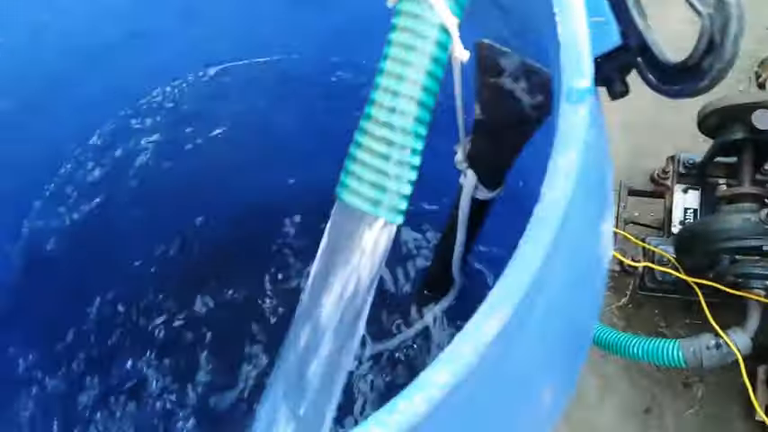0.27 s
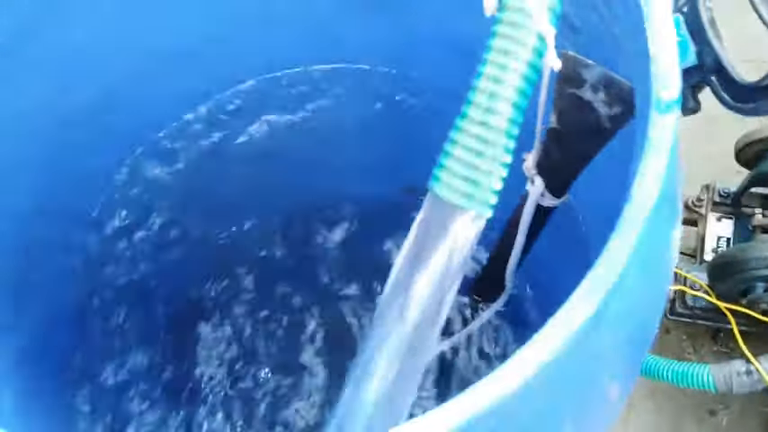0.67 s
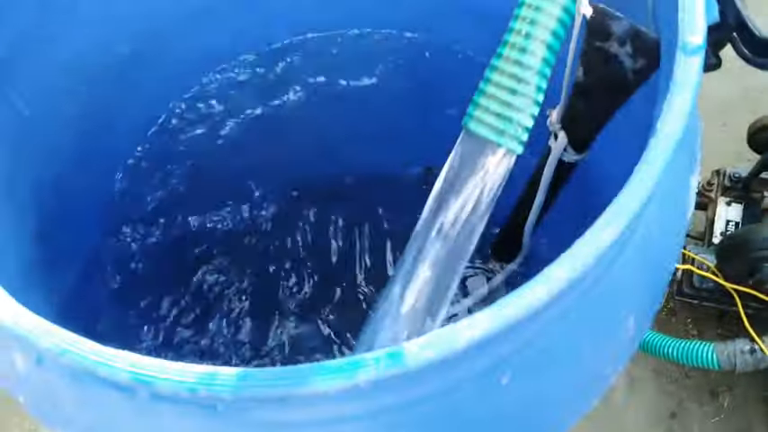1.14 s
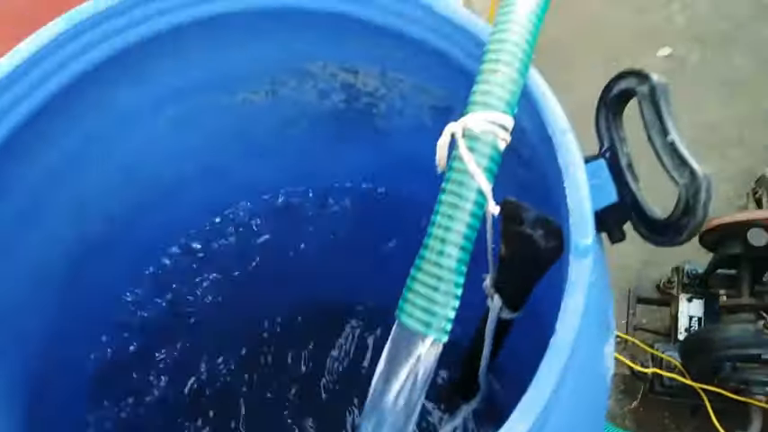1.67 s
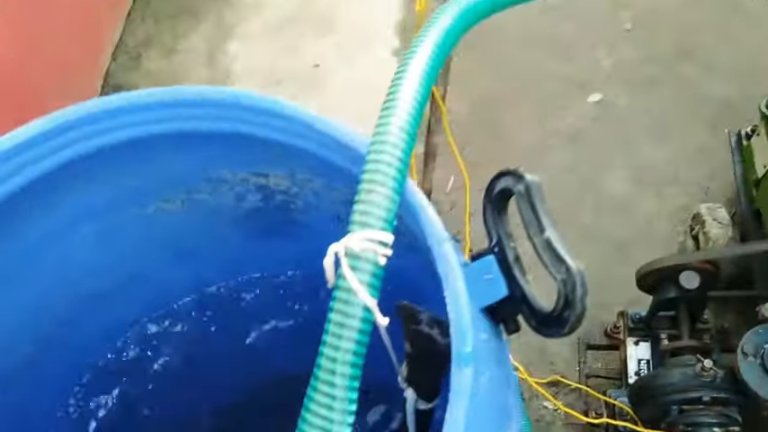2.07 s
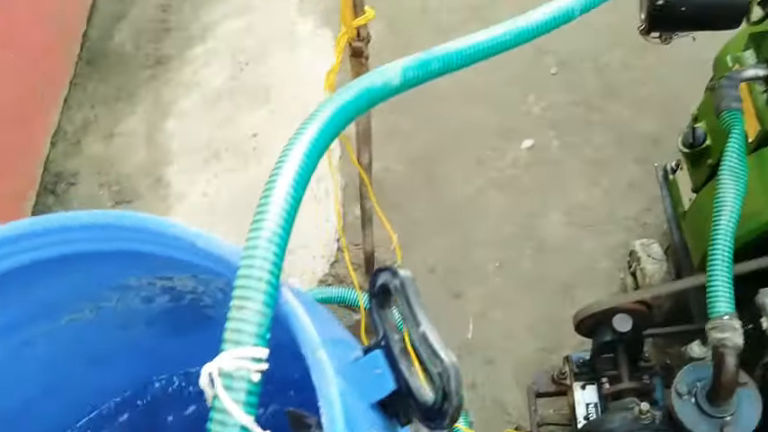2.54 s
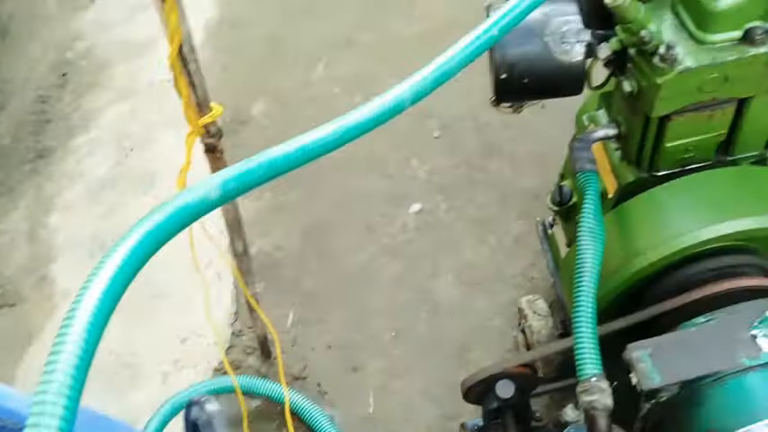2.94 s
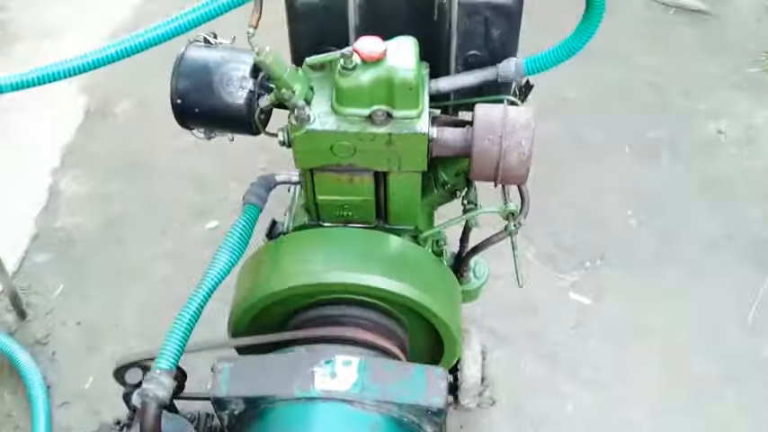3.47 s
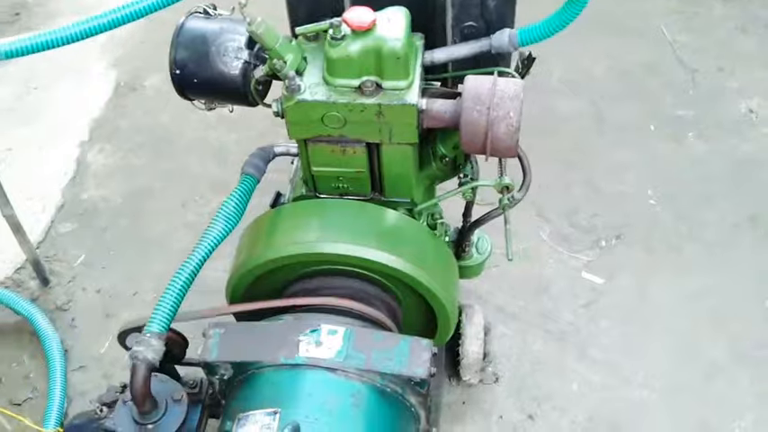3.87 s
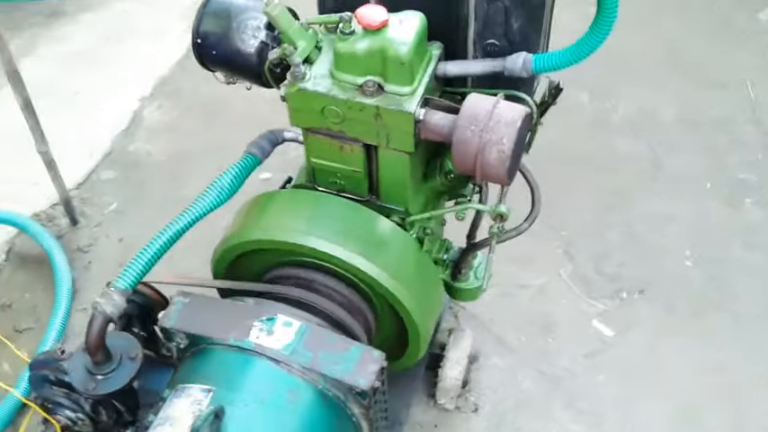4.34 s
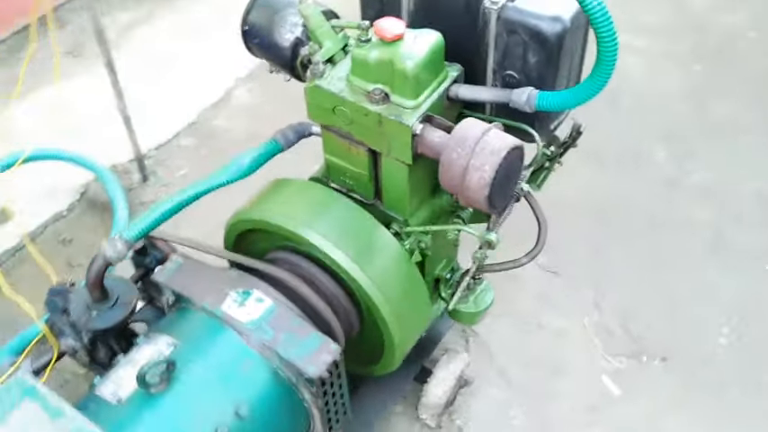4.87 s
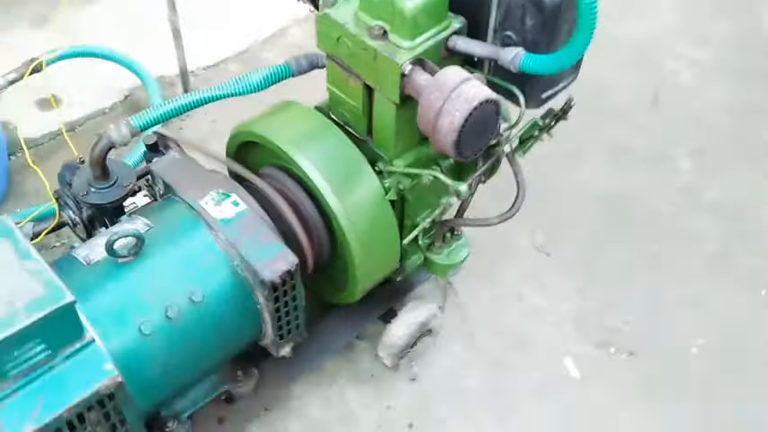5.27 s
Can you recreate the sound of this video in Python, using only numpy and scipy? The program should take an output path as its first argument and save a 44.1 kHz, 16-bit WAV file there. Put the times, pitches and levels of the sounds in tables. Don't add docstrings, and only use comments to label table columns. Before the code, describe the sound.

A one-cylinder diesel runs at a fast, even beat in a hard concrete space. Each cycle thumps, raps and knocks, shaking a ringing metal tank and loose parts. Water trickles faintly underneath. A handheld phone turns from the barrel to the engine, then a tiny dip just before four seconds cuts to a spot by the silencer, with more spitting hiss and less knock.

```python
import sys
import numpy as np
from scipy import signal
from scipy.fft import rfft, irfft
from scipy.io import wavfile
from scipy.ndimage import uniform_filter1d

SR = 44100
rng = np.random.default_rng(int(sys.argv[2]) if len(sys.argv) > 2 else 0)


def field_ratio(decibels):
    return 10 ** (np.asarray(decibels, dtype=float) / 20)


def output_pcm(signal):
    pcm = np.clip(np.atleast_2d(signal).T, -1, 1) * 32767
    wavfile.write(sys.argv[1], SR, np.round(pcm).astype(np.int16))


N = 242990


def level(x, rms_db):
    return x * field_ratio(rms_db) / np.sqrt(np.mean(x ** 2))


def ring(x, hz, width_hz):
    return signal.lfilter(*signal.iirpeak(hz, hz / width_hz, SR), x)


def modes(x, table):
    return sum(field_ratio(db) * ring(x, hz, width_hz) for hz, width_hz, db in table)


def colour(x, points, size=1024):
    hz, db = np.transpose(points)
    grid_hz = np.arange(size + 1) * SR / 2 / size
    log_gain = np.interp(np.log(grid_hz + 1), np.log(hz), db) * np.log(10) / 20
    cepstrum = irfft(log_gain)
    cepstrum[1:size] *= 2
    cepstrum[size + 1:] = 0
    return signal.fftconvolve(x, irfft(np.exp(rfft(cepstrum))))[:N]


def walk(rate_hz):
    hold = int(SR / rate_hz)
    steps = np.repeat(rng.standard_normal(N // hold + 1), hold)
    return level(uniform_filter1d(uniform_filter1d(steps, hold), hold)[:N], 0)


def train(times_s, sizes):
    at = np.round(times_s * SR).astype(int)
    keep = (at >= 0) & (at < N)
    return np.bincount(at[keep], (sizes * np.ones(len(at)))[keep], N)


def fade(x, decay_ms):
    return signal.lfilter([1], [1, -np.exp(-1000 / (decay_ms * SR))], x)


def ticks(rate_hz, spread_db, tail_ms):
    when, chance = rng.random((int(rate_hz * N / SR), 2)).T
    sizes = field_ratio(-2 * spread_db * np.log(1 - .995 * chance))
    power = fade(train(when * N / SR, sizes), tail_ms)
    return level(np.sqrt(power) * rng.standard_normal(N), 0)


# (time [s], cycles elapsed [count])
CYCLES_BARREL = [
    (0.0144, 0),
    (1.2208, 16),
    (3.7053, 49),
]
CYCLES_SILENCER = [
    (3.6466, 48),
    (5.5274, 73),
]


def openings(table):
    s, count = np.transpose(table)
    whole = np.arange(count[0] - 1, count[-1] + 2)
    period_s = (s[-1] - s[0]) / (count[-1] - count[0])
    return np.interp(whole, count, s - period_s * count) + period_s * whole


# (time after opening [ms], thump [gain], rap [gain], crack [gain])
PULSES_BARREL = [(-.6, 1, .81, -.5), (11.8, .66, .04, .19), (21.1, .19, .49, .87), (22.5, -.44, -.5, .42),
                 (26.4, -.05, .64, -.53), (38.8, .35, .31, .28), (43.3, .12, -.17, -.42),
                 (58.1, .35, .34, 0), (63.8, .43, .16, .16)]
PULSES_SILENCER = [(-.4, 1, .5, .03), (7.3, .24, .06, -.08), (20.3, 0, .06, -.27), (22.4, .12, .45, .04),
                   (26.3, 0, -.49, .05), (29.9, .11, 0, -.11), (45.8, 0, -.15, 0), (52.9, -.12, -.06, .09),
                   (69.1, .15, .17, 0)]


def pipes(times_s, pulses, low_cut_hz, cavity_gain):
    out = np.zeros((3, N))
    for ms, *gains in pulses:
        jitter, size_db = rng.standard_normal((len(times_s), 2)).T
        out += np.outer(gains, train(times_s + (ms + .04 * jitter) / 1000, field_ratio(size_db)))
    thump = ring(ring(out[0], 98, 120), 98, 200)
    rap = ring(ring(out[1], 301, 179), 301, 500)
    crack = ring(ring(out[2], 600, 645), 600, 1500)
    thump = signal.sosfilt(signal.butter(2, low_cut_hz, "high", fs=SR, output="sos"), thump)
    thump = thump + cavity_gain * ring(thump, 158, 35)
    rap = rap + 0.29 * ring(rap, 348.0, 55)
    turns = 2 * np.interp(np.arange(N) / SR, times_s, np.arange(len(times_s)))
    shaft = level(np.cos(2 * np.pi * turns + 1.4), -20)
    return (thump + 1.1 * rap + crack) / np.std(thump) + shaft


# (time after opening [ms], decay [ms], clatter [dB], knock [dB], treble [dB])
BLOWS = [
    (-15.5, 11, 2, 16, 0),
    (-10, 11, 2, 6, -3),
    (21, 4.5, 2, 4, 4),
    (43.5, 3, -6, -2, 1.5),
]


def shaking(times_s, spit_db, blow_db):
    power = np.ones((3, N))
    for ms, decay_ms, *db in BLOWS:
        sizes = field_ratio(2.2 * rng.standard_normal(len(times_s)))
        blow = fade(train(times_s + ms / 1000, sizes), decay_ms)
        power += np.outer(field_ratio(2 * np.array(db)), blow)
    power[0] = 1 + field_ratio(2 * blow_db) * (power[0] - 1)
    spit_ms, rise_ms, fall_ms = 1.6, .9, 2.1
    puff = train(times_s + spit_ms / 1000, field_ratio(1.8 * rng.standard_normal(len(times_s))))
    power[2] += 4.06 * field_ratio(2 * spit_db) * (fade(puff, fall_ms) - fade(puff, rise_ms))
    return np.sqrt(power)


# (frequency [Hz], width [Hz], level [dB])
TANK_BARREL = [
    [(674, 22, -34), (621.4, 14.3, 27)],
    [(684.6, 20.4, 12), (728, 7.3, -6.5)],
]
TANK_SILENCER = [
    [(588, 14, -14), (636, 25, -6)],
    [(672, 19, -0.36), (721, 150, -1.6)],
]


def tank(clatter, groups, upper_db):
    hum = rng.standard_normal(N) * clatter ** .5
    lower, upper = (level(modes(hum, group), 0) for group in groups)
    return lower + field_ratio(upper_db) * upper


# (frequency [Hz], density [dB per Hz])
RATTLE = [(120, -31.5), (260, -6), (400, -2.5), (700, 0.5), (1200, -2), (1700, 2), (1900, -5.5),
          (2400, -8.5), (3200, -43), (4500, -27.5)]


def loose_parts(rattle):
    return level(colour(rattle, RATTLE), 0.029)


# (frequency [Hz], width [Hz], level [dB])
CASTING = [(937, 20, 2), (979, 18, -6.5), (1078, 18, -15), (1421.4, 22, 0), (1487, 54, -19), (1661, 22, 3)]


def castings(clatter):
    return level(modes(ticks(900, 2, 3) * clatter, CASTING), 0)


# (frequency [Hz], width [Hz], level [dB])
SHELL = [(1094, 720, 12), (1390, 120, -3.5)]


def shell(rattle):
    return level(modes(modes(rattle, SHELL), SHELL), 0)


# (frequency [Hz], width [Hz], level [dB])
KNOCK = [(2630, 120, 0), (2950, 220, -12), (3600, 700, -19)]


def knocks(knock):
    return level(modes(ticks(900, 1, 3) * knock, KNOCK), 0)


# (frequency [Hz], density [dB per Hz])
AIR_BARREL = [(1500, -17), (3000, -1.5), (4300, 6), (5000, 2.5), (8000, -7.5), (11000, -7), (16000, -3.5)]
AIR_SILENCER = [(1500, -5), (3000, 5), (4900, 4), (8000, -13), (11000, -13), (16000, -9)]


def gas_treble(treble, air_colour, top_db):
    air = colour(ticks(880, 1.7, 13) * treble * field_ratio(.5 * walk(45)), air_colour)
    air = level(air + ring(air, 7880, 120), -4.5)
    top = irfft(rfft(air) * (np.arange(N // 2 + 1) * SR / N > 12700), N)
    return air + (field_ratio(top_db) - 1) * top


# (frequency [Hz], gain [dB])
IRON = [(3500, 0), (7000, -30)]


def engine(times_s, pulses, favours, tank_modes, air_colour, db):
    clatter, knock, treble = shaking(times_s, db["gas spit"], db["blows"])
    rattle = ticks(900, 2.4, 4) * clatter
    body = loose_parts(rattle)
    body = body + field_ratio(db["castings over clatter"]) * castings(clatter)
    body = body + field_ratio(db["shell over clatter"]) * shell(rattle)
    iron = field_ratio(db["thump"]) * pipes(times_s, pulses, *favours)
    iron += field_ratio(db["lower tank"]) * tank(clatter, tank_modes, db["upper over lower"])
    iron += field_ratio(db["clatter"]) * body
    iron += field_ratio(db["treble"] + db["knock over treble"]) * knocks(knock)
    air = field_ratio(db["treble"]) * gas_treble(treble, air_colour, db["top treble"])
    return colour(iron, IRON) + air


def water(water_db):
    out = np.zeros(N + 2048)
    for start, size, strength in rng.random((5000, 3)):
        hz = 700 * 10.0 ** size
        t = np.arange(int(2.7 / hz * SR * 2)) / SR
        cycles = hz * t
        grain = np.sin(2 * np.pi * cycles * (1 + 0.0053 * cycles)) * np.exp(-cycles / 0.75)
        gain = field_ratio(-2 * np.log(1 - .98 * strength)) * (700 / hz) ** .5
        at = int(start * N)
        out[at:at + len(t)] += grain * gain
    return field_ratio(water_db) * level(out[:N], 0)


VIEWS = {"thump": (-40.5, -39.5, -37, -37.5), "lower tank": (-30.5, -27, -28.5, -33),
         "upper over lower": (8, -3.5, 3.5, -2), "clatter": (-24.5, -24, -27, -28),
         "castings over clatter": (-3.5, -0.5, -3.5, -10.5), "treble": (-39, -39.5, -35.5, -34),
         "knock over treble": (1.5, -0.5, -9.5, -3), "gas spit": (3.8, 6.5, 9.4, 15),
         "blows": (0.58, 0.66, 0.67, 1.3), "shell over clatter": (-20, -25, -7, 1),
         "top treble": (-0.5, -1.5, 1, 1.5), "water": (-45, -44, -37.5, -32)}
# (time [s], way to next viewpoint [0-1], level [dB])
MOVE_BARREL = [
    (0, 0, 1.5),
    (1.3, 0, 0.5),
    (2.4, 0.27, 1.5),
    (3.1, 0.94, 1),
    (3.43, 1, 1.5),
    (3.48, 0.8, -2),
    (3.62, 0.9, -1.5),
    (3.7, 0.6, -5.5),
]
MOVE_SILENCER = [
    (3.71, 0, -3.2),
    (3.8, 0, 0.4),
    (4.5, 0.32, -0.32),
    (5.51, 0.71, -0.52),
]


def scene():
    cut_s, cut_fade_s = 3.7035, .004
    t = np.arange(N) / SR
    out = np.zeros(N)
    barrel = (MOVE_BARREL, slice(None, 2), CYCLES_BARREL,
              PULSES_BARREL, (15, .45), TANK_BARREL, AIR_BARREL, -1)
    silencer = (MOVE_SILENCER, slice(2, None), CYCLES_SILENCER,
                PULSES_SILENCER, (58, .1), TANK_SILENCER, AIR_SILENCER, 1)
    for move, pair, cycles, *place, side in (barrel, silencer):
        s, way, gain_db = np.transpose(move)
        way = np.interp(t, s, way)
        db = {part: np.dot(levels[pair], [1 - way, way]) for part, levels in VIEWS.items()}
        share = np.clip(side * (t - cut_s) / cut_fade_s + 0.2, 0, 1)
        share = share * field_ratio(np.interp(t, s, gain_db))
        out += share * (engine(openings(cycles), *place, db) + water(db["water"]))
    return out[None]


def band_limit(x):
    return signal.sosfilt(signal.butter(12, 16850, fs=SR, output="sos"), x)


# (frequency [Hz], gain [dB])
MICROPHONE = [(5000, 0.5), (6250, 13.5), (7300, 7.5), (11500, 4.5), (13500, 11), (15500, 19), (17000, 27)]


def record(dry):
    heard = np.tanh(1.93 * colour(dry[0], MICROPHONE)) / 2.508
    below_top = np.arange(N // 2 + 1) * SR / N < 15500
    heard = irfft(rfft(heard) * below_top, N)[None]
    return band_limit(heard)


dry = scene()
out = record(dry)
output_pcm(out)
```